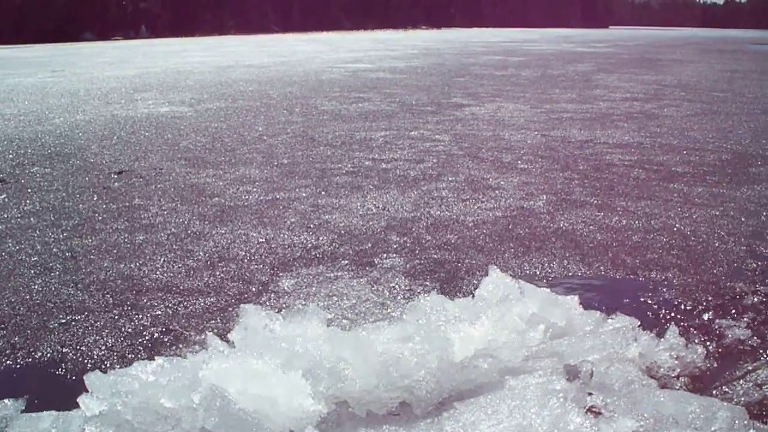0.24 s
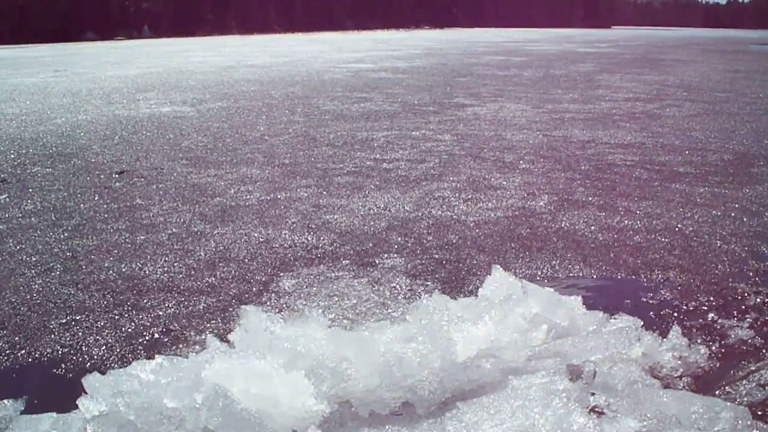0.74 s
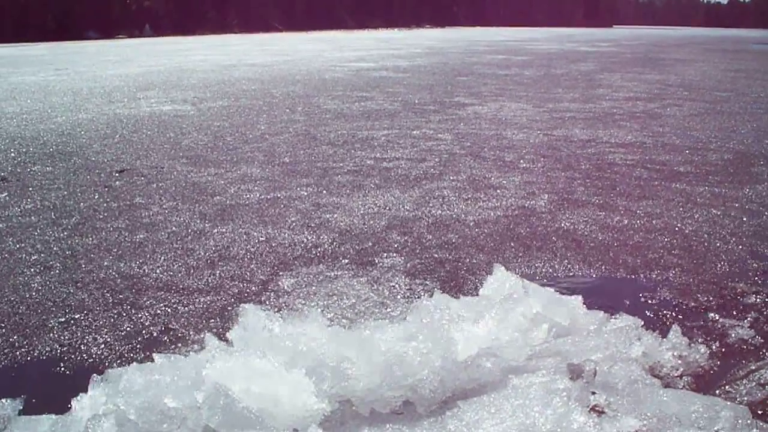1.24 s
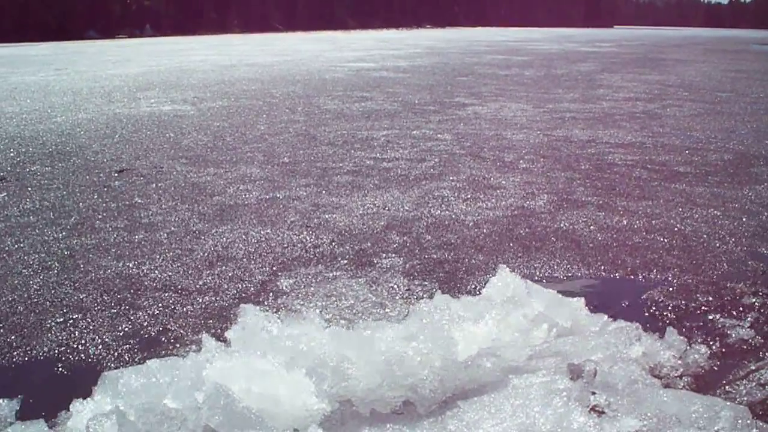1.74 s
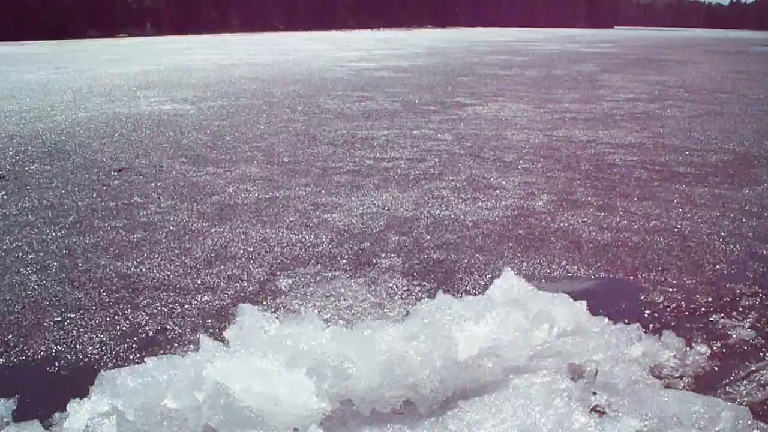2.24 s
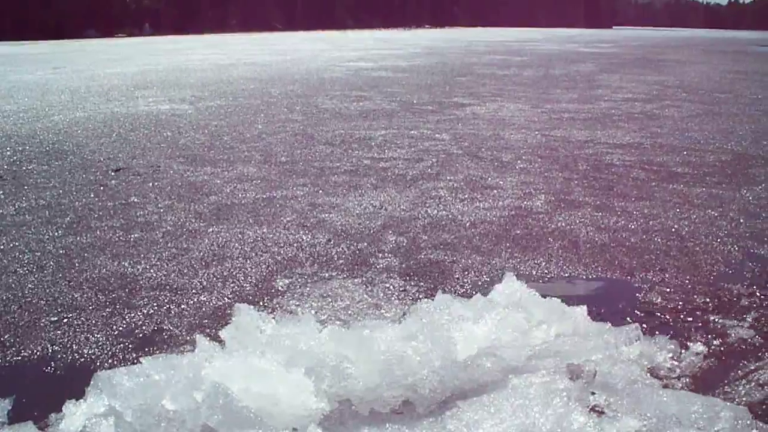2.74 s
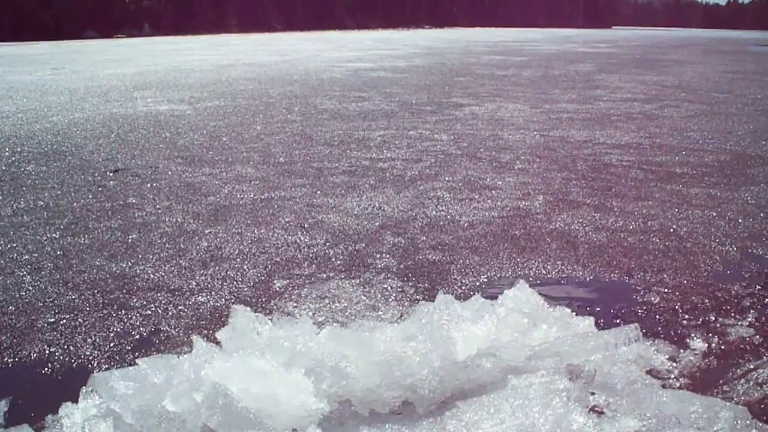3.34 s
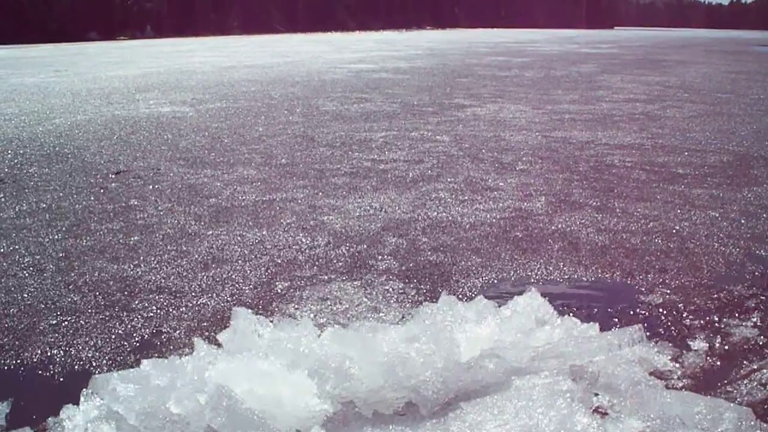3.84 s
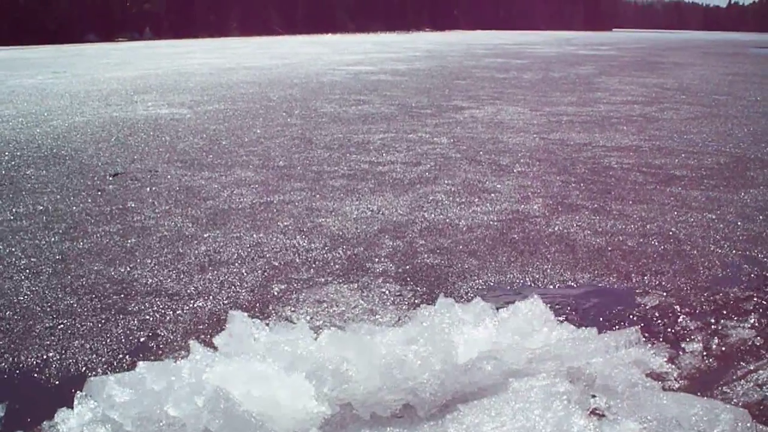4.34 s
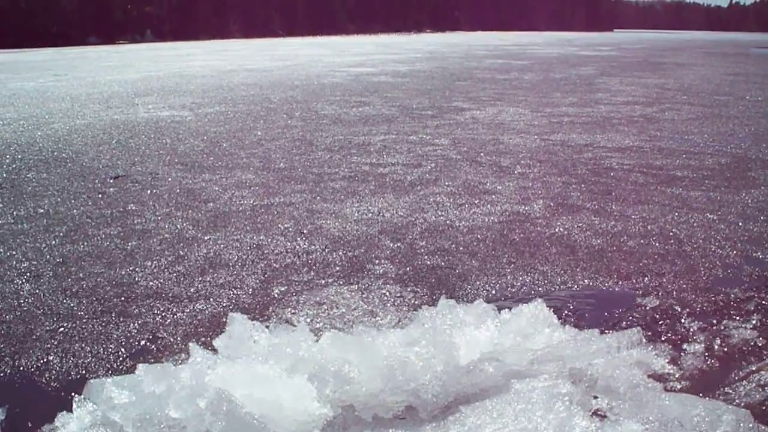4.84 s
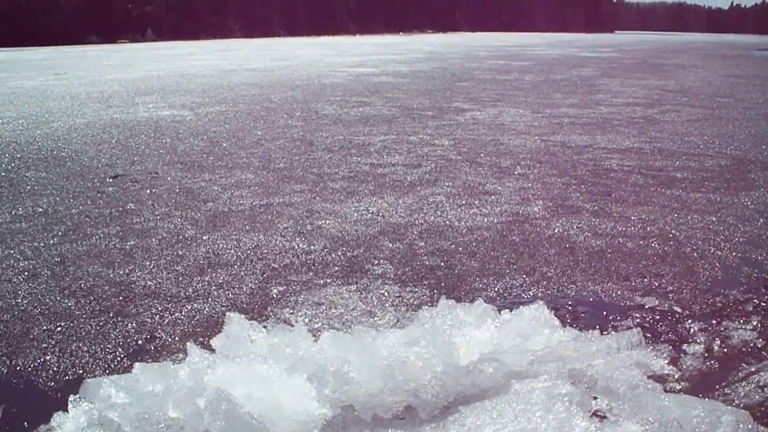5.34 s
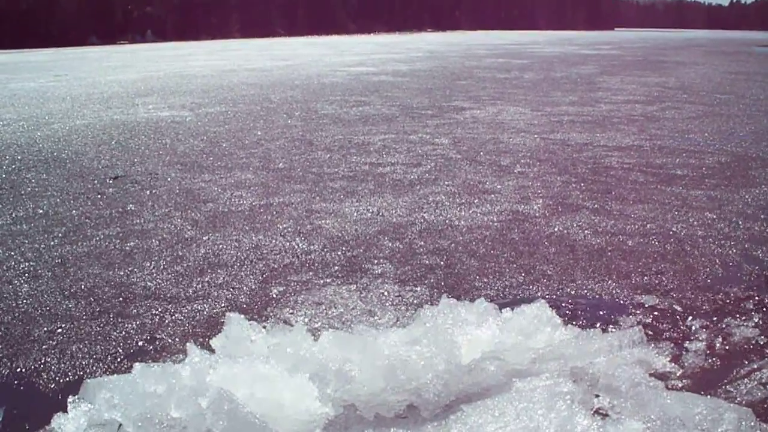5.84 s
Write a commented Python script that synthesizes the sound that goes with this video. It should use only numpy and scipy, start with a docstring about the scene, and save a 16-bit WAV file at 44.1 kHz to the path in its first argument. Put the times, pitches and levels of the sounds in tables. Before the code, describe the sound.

At the shore of a thawing lake, a heap of ice crystals shifts against drifting ice. A dense, dry crackle of tiny ticks runs throughout, low grinding beneath a bright needle-like fizz. Woody knocks, glassy tinks and brittle snaps stand out, busiest in the first half and sparser after about four seconds. Water is barely audible. The small close microphone sounds dry, slightly hollow, with dulled top treble.

```python
"""A dense crackle of candle ice, drifting loose against a heap at the shore of a thawing lake.
Countless crystals rub and tick as sums of short decaying sines over shaped noise.
Chunks knock and needles tink as damped rings with clatter; thin plates snap as noise bursts.
Water laps as low noise, puffs of breeze are quickening swings, and the electronics whine faintly.
The small microphone case cuts a notch in the ice sounds."""
import sys
import numpy as np
from scipy import signal
from scipy.io import wavfile
from scipy.ndimage import uniform_filter1d

SR = 44100
rng = np.random.default_rng(int(sys.argv[2]) if len(sys.argv) > 2 else 0)


def wav_out(sig):
    """Save sig, one row per channel (or a flat mono array), as 16-bit PCM at SR to the path in sys.argv[1]."""
    wavfile.write(sys.argv[1], SR, np.round(np.clip(np.atleast_2d(sig).T, -1, 1) * 32767).astype(np.int16))


N = 269001  # samples, 6.1 s

# how hard the pack presses: [t/s, grinding level/dB, jostling level/dB]
PACK_PRESSURE = [(0.0, -46.5, -46.5), (0.32, -47.5, -48.5), (0.52, -42, -43.5), (0.58, -44.5, -46),
                 (0.78, -44, -46.5), (0.88, -48, -49.5), (1.2, -43, -41.5), (1.25, -46.5, -46.5),
                 (1.36, -40, -39.5), (1.7, -47.5, -47.5), (2.39, -47, -48), (2.6, -45.5, -45),
                 (2.97, -44, -46.5), (3.13, -47, -47), (3.21, -44, -45.5), (3.27, -46, -49),
                 (3.55, -44.5, -47), (4.13, -47.5, -48.5), (4.22, -48.5, -53.5), (4.4, -46.5, -47.5),
                 (4.89, -47, -49.5), (5.13, -49.5, -51), (5.75, -46, -50.5), (5.81, -47.5, -52),
                 (5.88, -45, -46.5), (6.1, -49, -51)]
# spectral weight of thick chunks: [f/Hz, relative level per Hz/dB]
CHUNK_SPECTRUM = [(40, -44.5), (120, -14.5), (300, -9.5), (480, -2), (850, -1), (1400, -2), (2200, -8.5),
                  (3000, -11.5), (4000, -21), (6000, -29.5)]
# spectral weight of thin needles: [f/Hz, relative level per Hz/dB]
NEEDLE_SPECTRUM = [(2000, -19), (3500, -10), (5000, -7.5), (6300, -3.5), (7300, -1), (8100, -8.5),
                   (9300, -9.5)]


def gain_of(db):
    """Level to amplitude: 20 dB is a factor of ten."""
    return 10 ** (np.asarray(db) / 20)


def evened(x):
    """Normalization: the signal is scaled to rms 1."""
    return x / np.sqrt(np.mean(x ** 2) + 1e-20)


def coloured(x, points):
    """Minimum-phase filtering: the Hilbert transform of the log gain supplies a causal phase."""
    f, db = np.transpose(points)
    hz = abs(np.fft.fftfreq(4096, 1 / SR))
    log_gain = np.interp(np.log(hz + 1), np.log(f), db) * np.log(10) / 20
    response = np.exp(np.conj(signal.hilbert(log_gain)))
    taps = np.fft.ifft(response).real[:2048]
    return signal.oaconvolve(x, taps)[:len(x)]


def curve(rows, axis):
    """Linear interpolation: one column of a time table at every sample."""
    rows = np.array(rows)
    return np.interp(np.arange(N) / SR, rows[:, 0], rows[:, axis])


def through_case(x):
    """Cavity absorption: a zero pair inside a broader pole pair cuts a dip in the spectrum."""
    # side cavity of the case: [f/Hz, width/Hz, depth/dB]
    side_cavity = (4190, 2690, -42)
    hz, width, depth_db = side_cavity
    turn = np.exp(2j * np.pi * hz / SR * np.array([1, -1]))
    pole = np.exp(-np.pi * width / SR)
    zero = np.exp(-np.pi * width * gain_of(depth_db) / SR)
    level = (1 + pole) ** 2 / (1 + zero) ** 2
    return signal.lfilter(np.poly(zero * turn).real * level, np.poly(pole * turn).real, x)


def crowd(spectrum, lo_hz, hi_hz, per_s, spread_db, cycles, clump_db, clump_s,
          wash, flurries_per_s, flurry, flurry_s):
    """Superposition: random small strikes each ring a few cycles over the noise of far ones."""
    window = int(clump_s * SR)
    clumps = evened(uniform_filter1d(uniform_filter1d(rng.standard_normal(N), window), window))
    struck = rng.random(N) < per_s / SR
    strikes = struck * gain_of(spread_db * np.minimum(rng.exponential(1, N), 3.6))

    # each strike lands on one of 40 pieces, spaced evenly in log frequency
    piece = rng.integers(0, 40, N)
    near = np.zeros(N)
    for k, hz in enumerate(np.geomspace(lo_hz, hi_hz, 40)):
        turns = np.arange(1200) / SR * hz
        decay_cycles = cycles * rng.uniform(0.23, 2.74)
        ring = np.sin(2 * np.pi * turns) * np.exp(-turns / decay_cycles)
        ring *= np.sqrt(hz) / np.linalg.norm(ring)
        near += signal.oaconvolve(strikes * (piece == k), ring)[:N]

    # small slips start sudden flurries that die in a few milliseconds
    slips = rng.exponential(flurry, N) * (rng.random(N) < flurries_per_s / SR)
    flurries = 1 + signal.lfilter([1], [1, -np.exp(-1 / (flurry_s * SR))], slips)
    far = evened(flurries * rng.standard_normal(N))

    # wash is the far share of the power
    mix = np.sqrt(1 - wash) * evened(near) + np.sqrt(wash) * far
    clumped = mix * gain_of(clump_db * clumps)
    return evened(through_case(coloured(clumped, spectrum)))


def grinding():
    """Frictional excitation: chunks of the pack rub and bump, setting off low, brief rings."""
    chunks = crowd(CHUNK_SPECTRUM, lo_hz=252.0, hi_hz=5030, per_s=1400, spread_db=2.43, cycles=3.97,
                   clump_db=0.49, clump_s=0.042, wash=0.83,
                   flurries_per_s=60, flurry=0.26, flurry_s=0.004)
    return gain_of(curve(PACK_PRESSURE, axis=1)) * chunks


def jostling():
    """Impact excitation: thin needles tick together, ringing high and for more cycles."""
    needles = crowd(NEEDLE_SPECTRUM, lo_hz=3000, hi_hz=9090, per_s=2400, spread_db=3.8, cycles=10.0,
                    clump_db=0.87, clump_s=0.01, wash=0.75,
                    flurries_per_s=100, flurry=0.5, flurry_s=0.0017)
    return gain_of(curve(PACK_PRESSURE, axis=2)) * needles


def blows(rows, spectrum, rise_s, t60_at_1k, clatter, slope):
    """Damped resonance: each blow adds clatter to a ring; a higher ring dies sooner by slope."""
    out = np.zeros(N + 4096)
    t = np.arange(4096) / SR
    for s, db, hz in rows:
        t60 = t60_at_1k * (1000 / hz) ** slope
        shape = (1 - np.exp(-t / rise_s)) * gain_of(-60 * t / t60)
        ring = np.sin(2 * np.pi * hz * t)
        burst = evened(through_case(coloured(rng.standard_normal(4096), spectrum)))
        sound = shape / shape.max() * ((1 - clatter) * ring + 0.93 * clatter * burst)
        at = round(s * SR)
        out[at:at + 4096] += gain_of(db) * sound
    return out[:N]


def knocks():
    """Modal impact: a struck chunk gives one low, heavily damped ring."""
    # chunks knocking: [t/s, level/dB, f/Hz of the ring]
    chunk_blows = [(0.2425, -25, 1160), (0.2432, -33, 1980), (0.2721, -31, 1130), (0.4419, -35, 860),
                   (0.4983, -32, 1070), (0.5057, -36, 800), (0.5262, -28, 855), (0.607, -31, 1230),
                   (0.694, -35, 1610), (0.7388, -28.5, 1150), (0.7908, -28, 747), (1.1622, -37, 433),
                   (1.1761, -33, 1640), (1.1995, -33, 1370), (1.3825, -31, 1360), (1.4062, -26.5, 1270),
                   (1.4384, -35, 1380), (1.5677, -32, 1610), (1.6886, -26.5, 765), (1.6923, -29.5, 1530),
                   (1.8217, -34.5, 1320), (1.9251, -34, 1760), (2.4728, -36, 870), (2.7586, -33, 760),
                   (2.914, -32, 500), (2.9524, -28, 1210), (3.2283, -36, 830), (3.6764, -33.5, 1550),
                   (4.1343, -38, 1100), (4.8955, -35, 613), (4.9056, -34, 740), (4.9175, -33.5, 725),
                   (5.0636, -35, 1410), (5.4554, -36, 527), (5.5554, -36, 1120), (5.5947, -33, 1270),
                   (5.6516, -32, 826), (5.7387, -35, 730), (5.749, -38, 900), (5.8327, -30.5, 850),
                   (5.8636, -31.5, 510), (5.8663, -29.5, 1240), (5.883, -35, 870), (5.9313, -41, 960),
                   (6.0421, -34, 825)]
    return blows(chunk_blows, CHUNK_SPECTRUM, rise_s=0.00051, t60_at_1k=0.021, clatter=0.3, slope=0.1)


def tinks():
    """Modal impact: a struck needle or splinter gives one ring, mostly high."""
    # needles and splinters striking: [t/s, level/dB, f/Hz of the ring]
    needle_blows = [(0.2414, -33, 7000), (0.433, -30, 7490), (0.5253, -36, 5470), (0.5482, -32, 6450),
                    (0.5858, -28, 6800), (0.5862, -33, 5900), (1.0449, -38, 3630), (1.094, -45, 3800),
                    (1.1488, -42, 3600), (1.1496, -32, 8050), (1.1629, -33, 5930), (1.2117, -25.5, 2070),
                    (1.2137, -38, 5200), (1.2914, -33, 5850), (1.3426, -35, 7060), (1.3816, -34, 5170),
                    (1.4346, -30, 5510), (1.4417, -29, 2540), (1.5604, -32, 7850), (1.5735, -35, 5750),
                    (1.5946, -35, 7650), (1.597, -37, 2560), (1.6462, -45, 3760), (1.6499, -32, 6440),
                    (1.6886, -33, 2140), (1.816, -40, 7600), (1.8766, -37, 6240), (1.8773, -36, 4880),
                    (1.9207, -35, 4910), (1.9223, -30.5, 7100), (1.9864, -26, 6930), (1.9881, -32, 7900),
                    (2.0991, -34.5, 3210), (2.1012, -30.5, 6500), (2.3349, -34.5, 6290),
                    (2.4778, -33, 7000), (2.6861, -32, 7320), (2.693, -37, 2980), (2.6949, -37, 5800),
                    (2.7528, -35, 7500), (2.798, -43, 3190), (2.8852, -34, 5320), (2.886, -45, 3200),
                    (2.8863, -31, 7040), (2.9351, -37, 7300), (2.9628, -35, 3270), (2.9892, -26.5, 5600),
                    (3.062, -44, 2780), (3.096, -38, 2170), (3.1398, -31, 7450), (3.1503, -36, 2150),
                    (3.204, -33, 7100), (3.2238, -32, 7500), (3.3806, -27, 6200), (3.4981, -34, 5550),
                    (3.5148, -40.5, 2890), (3.6018, -26, 7050), (3.6783, -32, 6600), (3.6899, -41, 3220),
                    (3.796, -27, 6740), (4.0264, -40.5, 2600), (4.1539, -35, 5770), (4.3982, -40, 3520),
                    (4.5862, -36, 6200), (4.637, -42, 2770), (4.7561, -35, 6800), (4.7702, -39, 4950),
                    (4.9291, -33, 7400), (5.3639, -39, 7200), (5.5915, -28, 6440), (5.6862, -38, 6700),
                    (5.7146, -37.5, 5500), (5.7744, -33, 6060), (5.8968, -44, 3500), (5.8993, -33.5, 6560),
                    (5.9405, -38, 6900), (6.0131, -36, 6500), (6.0429, -34, 6700)]
    return blows(needle_blows, NEEDLE_SPECTRUM, rise_s=0.00027, t60_at_1k=0.069, clatter=0.4, slope=0.65)


def cracks():
    """Brittle fracture: each snap shakes needles and chunks together in a short broad burst."""
    # thin ice cracking: [t/s, treble level/dB, body level against the treble/dB]
    snaps = [(0.4314, -38, -12), (0.497, -45, 11), (0.5837, -34, -8), (0.6929, -34, -5), (1.1483, -33, -15),
             (1.1754, -30, -13), (1.2107, -37.5, 4.5), (1.3416, -27, -14), (1.434, -29, -2),
             (1.5938, -27, -8), (1.6891, -28.5, 1.5), (1.747, -34, -12), (1.8134, -31, -3),
             (1.8754, -29, -15), (1.986, -32, -25), (2.0457, -32.5, -18), (2.0984, -26.5, -16),
             (2.3337, -34, -5), (2.4757, -35, -20), (2.693, -30.5, -20), (2.723, -34, -10),
             (2.7512, -31.5, -16), (2.7964, -35, 2.5), (2.9495, -27, -1.5), (2.9889, -28, -27),
             (3.139, -38, -18), (3.1921, -33, -8), (3.241, -34, -13), (3.4974, -34.5, -1),
             (3.6004, -29.5, -21), (3.6787, -32, -3), (3.7943, -33, -3), (4.136, -34, -1), (4.153, -36, 0),
             (4.7551, -35, 1), (4.827, -33, -18), (4.9283, -36, -7), (5.739, -35.5, 4), (6.0429, -36, -4.5)]
    bright, body = np.zeros((2, N + 2048))
    t = np.arange(2048) / SR
    rise_s, t60_s = 0.00056, 0.025
    shape = (1 - np.exp(-t / rise_s)) * gain_of(-60 * t / t60_s)
    for s, db, body_db in snaps:
        needle_noise, chunk_noise = rng.standard_normal((2, 2048))
        at = round(s * SR)
        bright[at:at + 2048] += gain_of(db) * shape * needle_noise
        body[at:at + 2048] += gain_of(db + body_db) * shape * chunk_noise

    # each filter is scaled to unit energy, so colouring keeps the noise power
    click = signal.unit_impulse(2048)
    both = np.zeros(N + 2048)
    for x, spectrum in ((bright, NEEDLE_SPECTRUM), (body, CHUNK_SPECTRUM)):
        both += coloured(x, spectrum) / np.linalg.norm(coloured(click, spectrum))
    return through_case(both)[:N]


def lapping():
    """Turbulent noise: many unresolved water motions make a low uneven wash."""
    # strength of the lapping: [t/s, level/dB]
    lap_level = [(0.0, -65.5), (0.97, -67.5), (1.3, -71), (1.8, -66), (3.11, -65.5), (4.94, -66.5),
                 (5.21, -63), (5.56, -67.5), (5.95, -58), (6.1, -67)]
    # spectral weight of the water: [f/Hz, relative level per Hz/dB]
    water_spectrum = [(10, -28), (25, -13), (50, -2.5), (100, 0.5), (200, 5), (350, -3.5), (700, -47)]
    wash = evened(coloured(rng.standard_normal(N), water_spectrum))
    return gain_of(curve(lap_level, axis=1)) * wash


def breeze():
    """Wind pressure on the diaphragm: each puff swings it to and fro, ever quicker."""
    # puffs of breeze on the microphone port: [t/s, level/dB, length/s]
    puffs = [(4.899, -70, 0.065), (5.043, -57, 0.05), (5.184, -55.5, 0.046)]
    t = np.arange(N) / SR
    out = np.zeros(N)
    for s, db, length in puffs:
        u = np.clip((t - s) / length, 0, 1)
        swing = np.sin(2 * np.pi * 3.3 * u ** 1.9)  # 3.3 cycles in all
        out += gain_of(db) * np.sin(np.pi * u) ** 2 * swing
    return out


def scene():
    """Linear superposition: the pressures of ice, water and air add."""
    ice = grinding() + jostling() + knocks() + tinks() + cracks()
    return (ice + lapping() + breeze())[None]


def record(dry):
    """Band limitation: the treble is dulled, electronic whine joins, and a low-pass ends the band."""
    # treble loss of the recorder: [f/Hz, gain/dB]
    treble_loss = [(20, -2), (8000, -1), (8500, -9.5), (8800, -20.5), (9050, -30.5), (9300, -43.5)]
    # faint steady tones of the electronics: [f/Hz, rms level/dB]
    whine_tones = [(7829, -77), (8171, -81)]
    t = np.arange(N) / SR
    whine = np.zeros(N)
    for hz, db in whine_tones:
        whine += np.sqrt(2) * gain_of(db) * np.sin(2 * np.pi * hz * t)
    dulled = coloured(dry[0], treble_loss)
    edge_hz = 9092
    low_pass = signal.firwin(511, edge_hz, window=("kaiser", 9), fs=SR)
    return signal.oaconvolve(dulled + whine, low_pass, "same")[None]


dry = scene()
out = record(dry)
wav_out(out)
```